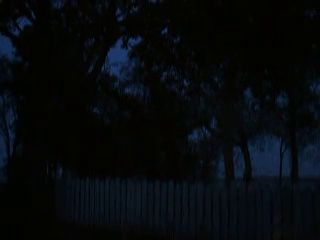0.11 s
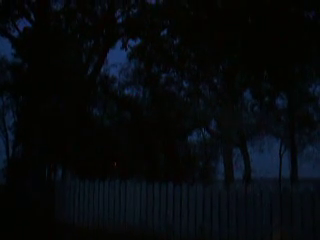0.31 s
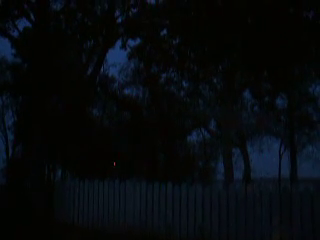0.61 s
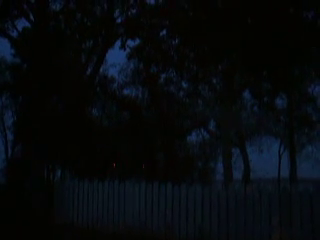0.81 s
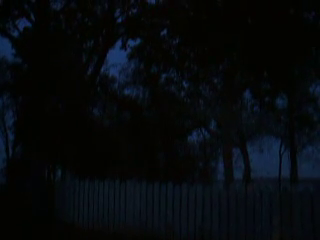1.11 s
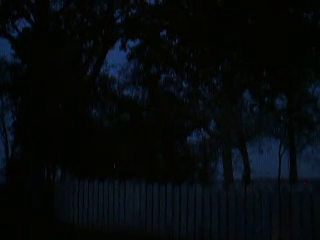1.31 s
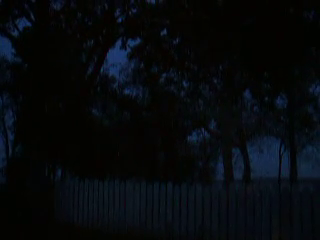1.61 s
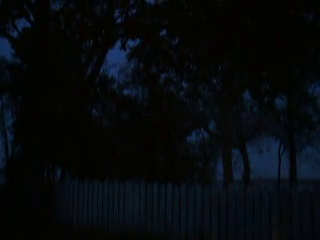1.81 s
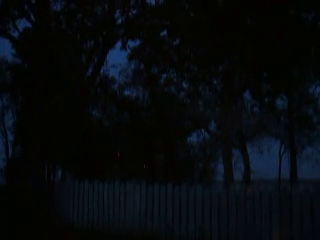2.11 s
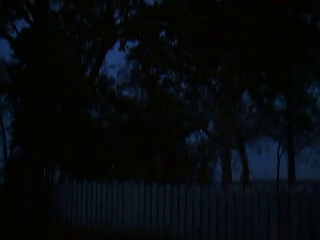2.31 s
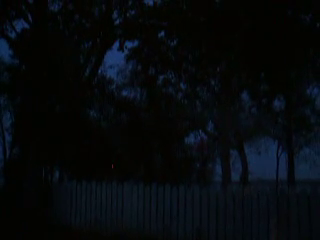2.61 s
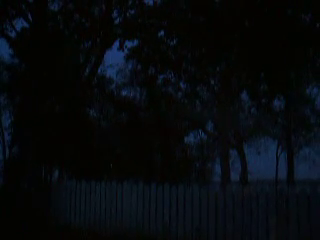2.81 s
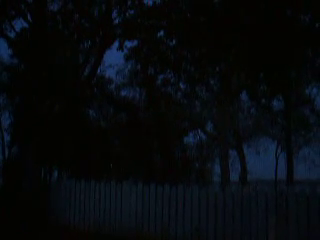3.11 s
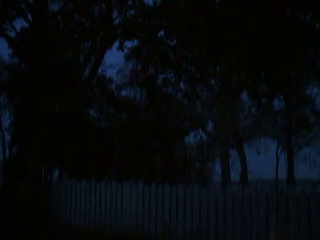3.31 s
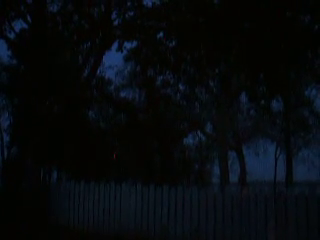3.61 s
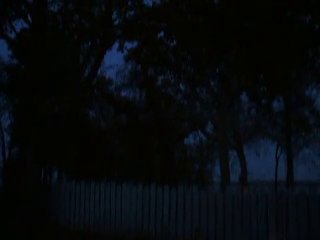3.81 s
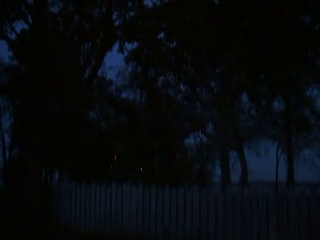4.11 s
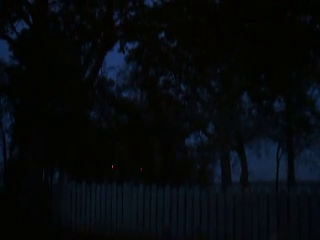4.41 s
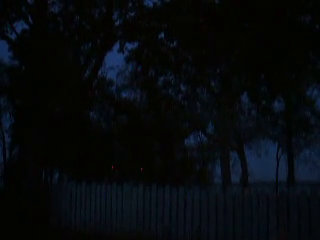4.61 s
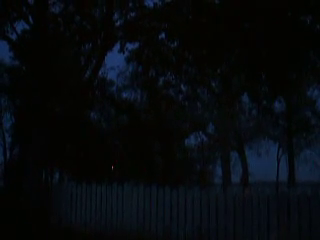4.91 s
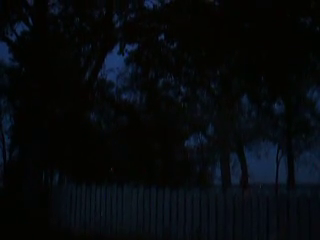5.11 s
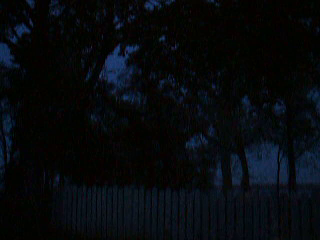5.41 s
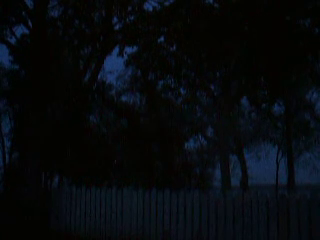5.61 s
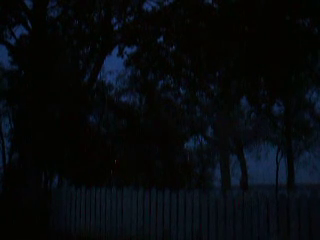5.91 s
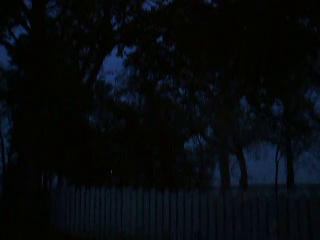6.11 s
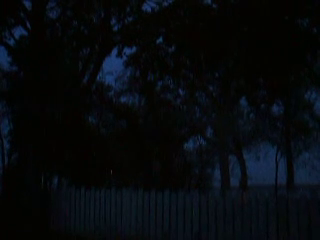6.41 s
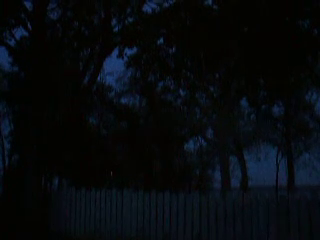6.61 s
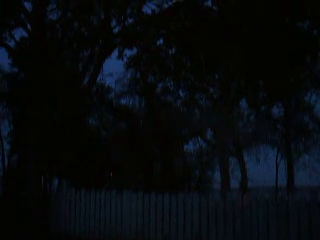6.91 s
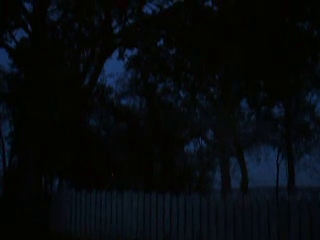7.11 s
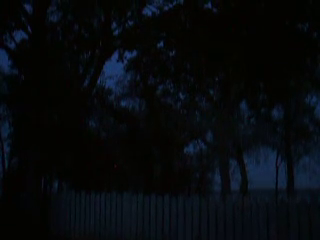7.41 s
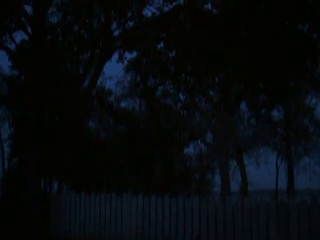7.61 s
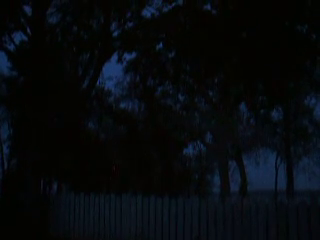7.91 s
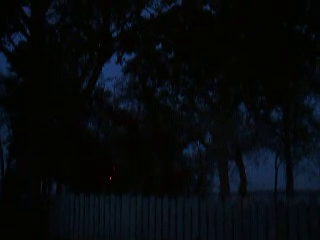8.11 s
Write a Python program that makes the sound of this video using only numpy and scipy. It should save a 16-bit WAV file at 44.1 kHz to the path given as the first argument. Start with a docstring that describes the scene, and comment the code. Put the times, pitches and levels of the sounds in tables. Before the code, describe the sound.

A dawn chorus in a fenced garden with tall trees, captured by a small hissy microphone. Low distant rumble, soft hiss and a barely audible thin whine continue throughout. From 0.2 to 2 seconds, sharp chips drop steeply in pitch about six times a second; thinner ticks take over from 1.8 to 4.3. A high falling tseep comes roughly every second from 1.0, strongest near 5.5. Soft rising and falling whistles and buzzy twitters appear around 1-2 seconds and again at 4.4-5.5, with faint pips from 3.4 to 4.3. Calls swooping down and up come at 5.8, 6.9 and 7.9. Quick carolled warbles sound near 6.3 and 7.4. Brighter chips return from 6.9 to 8.2, with more whistles. Far birds twitter continuously, swelling around 2 and 3.4-5 seconds and thinning near 6.7; every note is blurred by echoes from trunks and leaves.

```python
"""Dawn chorus in a garden with tall trees

A small camera with a hissy microphone hears falling chips, thinner ticks and a high 'tseep' about once a second.
Other birds swoop, whistle, pip and carol; far ones twitter. Each voice is an unsteady sine on a pitch curve.
Trunks and leaves scatter every note by sparse random echoes, over shaped noise: low distant rumble and hiss.
"""
import sys
import numpy as np
from scipy import signal
from scipy.fft import rfft, irfft
from scipy.io import wavfile
from scipy.ndimage import uniform_filter1d

SR = 44100
rng = np.random.default_rng(int(sys.argv[2]) if len(sys.argv) > 2 else 0)


def wav_record(signal):
    """Record a signal, one row per channel, as 16-bit PCM in the file named by sys.argv[1]."""
    frames = np.transpose(np.atleast_2d(signal))
    bounded = np.clip(frames, -1, 1)
    # unit amplitude maps onto the largest positive 16-bit level
    quanta = np.round(bounded * 32767).astype(np.int16)
    wavfile.write(sys.argv[1], SR, quanta)


N = 364707


def gain_of(db):
    """Decibels to amplitude."""
    return 10 ** (np.asarray(db) / 20)


def evened(x):
    """Scales to rms 1."""
    return x / np.sqrt(np.mean(x ** 2) + 1e-20)


def read(points, hz):
    """Reads a table on a log-frequency axis."""
    f, value = np.transpose(points)
    return np.interp(np.log(hz + 1), np.log(f + 1), value)


def add(mix, s, sound):
    """Mixes a sound in at time s, cut off at the end of the mix."""
    part = mix[max(round(s * SR), 0):][:len(sound)]
    part += sound[:len(part)]


def drift(count, size):
    """Random wander of rms 1, noise smoothed twice over size samples."""
    smooth = uniform_filter1d(rng.standard_normal(count), size)
    return evened(uniform_filter1d(smooth, size))


def syrinx(hz, fade, waver=0.0067, flutter_db=2.33):
    """A bird's voice box: a nearly pure tone on a pitch curve, unsteady in pitch and level, with soft ends."""
    count = len(hz)
    unsteady_hz = hz * (1 + waver * drift(count, size=120))
    turns = np.cumsum(unsteady_hz) / SR
    flutter = gain_of(flutter_db * drift(count, size=240))
    swell = signal.windows.tukey(count, np.clip(fade, .05, 1)) * flutter
    return np.sqrt(2) * swell * np.sin(2 * np.pi * turns)


def slur(length, start_hz, middle_hz, end_hz, warble_hz, warble_rate, fade):
    """One note on a parabola of pitch, with a fast warble riding on it."""
    t = np.arange(int(max(length, .01) * SR)) / SR
    curve = np.polyfit([0, .5, 1], [start_hz, middle_hz, end_hz], 2)
    arch = np.polyval(curve, t / t[-1])
    warble = warble_hz * np.sin(2 * np.pi * warble_rate * t)
    return syrinx(arch + warble, fade)


def trees(x, near_db, far_db, near_t60):
    """Quick scatter from nearby trunks and leaves, then a long thin tail from the whole grove."""
    # decay of the grove's tail by pitch: f/Hz, t60/s
    grove_decay = [(1500, 0.73), (3000, 1), (6000, 0.69)]
    t = np.arange(SR) / SR
    # sparse clicks of either sign, 3000 a second on average
    near, far = rng.choice([-1., 1.], (2, SR)) * (rng.random((2, SR)) < 3000 / SR)
    near = near * gain_of(-60 * t / near_t60) * (1 - np.exp(-t / 0.0024))
    # the far tail builds up more slowly and each frequency dies at its own pace
    hz, at, z = signal.stft(far * (1 - np.exp(-t / 0.019)), SR, nperseg=256)
    tail = z * gain_of(-60 * at / read(grove_decay, hz)[:, None])
    far = signal.istft(tail, SR, nperseg=256)[1][:SR]
    near_echoes = gain_of(near_db) * near / np.linalg.norm(near)
    far_echoes = gain_of(far_db) * far / np.linalg.norm(far)
    return x + signal.fftconvolve(x, near_echoes + far_echoes)[:N]


def repeater(shape, rows, spread, uneven_db=.3):
    """A bird that repeats one syllable, never at quite the same pitch or strength."""
    at, hz, db = np.transpose(shape)
    t = np.arange(0, at[-1], 1 / SR)
    out = np.zeros(N)
    chances = rng.standard_normal((len(rows), 2))
    # a row may end in a pitch factor; without one the product is 1
    for (s, level_db, *factor), (sharp, loud) in zip(rows, chances):
        pitch = np.interp(t, at, hz) * np.prod(factor) * (1 + spread * sharp)
        tone = syrinx(pitch, fade=0.044)
        add(out, s, tone * gain_of(level_db + uneven_db * loud + np.interp(t, at, db)))
    return out


def run_of(runs, lag_s):
    """Times and levels of each run's syllables: a steady beat after a slow start, on one arch of loudness."""
    settle_beats = 1.7  # time constant of the slow start
    rows = []
    for first, last, beat, *levels_db in runs:
        k = np.arange(round((last - first) / beat) + 1)
        times = first + k * beat + lag_s * (1 - np.exp(-k / settle_beats))
        loudness = np.polyfit([0, .5, 1], levels_db, 2)
        rows += zip(times, np.polyval(loudness, k / k[-1]))
    return rows


def whistler(rows, contour, fade):
    """Clear slurs of one contour with a slight warble, easing off in level toward the end."""
    out = np.zeros(N)
    for s, length, hz, db in rows:
        note = slur(length, *hz * np.array(contour), warble_hz=20, warble_rate=40, fade=fade)
        add(out, s, note * gain_of(db + np.linspace(.2, -1.5, len(note))))
    return out


def warbler(rows, warble_rate, fade):
    """Short arched syllables with a quick shake of pitch."""
    # share of the note's pitch at its start, middle and end
    arch = (.94, 1.01, .97)
    out = np.zeros(N)
    for s, length, hz, db, warble_hz in rows:
        note = slur(length, *hz * np.array(arch), warble_hz, warble_rate, fade)
        add(out, s, gain_of(db) * note)
    return out


def air():
    """Low distant rumble running up into microphone hiss: shaped noise whose level wanders slightly."""
    # noise spectrum, relative: f/Hz, density/dB
    spectrum = [(20, -6.5), (45, -1.5), (70, 1.5), (95, -5.5), (125, -2), (188, 0.5), (270, -9.5),
                (600, -9.5), (1400, -14), (2200, -15.5), (4600, -19.5), (6000, -19.5), (7700, -23.5),
                (8400, -32)]
    hz = np.fft.rfftfreq(N, 1 / SR)
    shape = gain_of(read(spectrum, hz)) * (hz < 9000)
    noise = irfft(rfft(rng.standard_normal(N)) * shape, N)
    return gain_of(-47 + 0.36 * drift(N, size=4000)) * evened(noise)


def far_chorus(count, low_hz, high_hz, level_db):
    """Many birds too far off to tell apart: one note per equal slot, at a chance moment, pitch and bend."""
    # how busy the far birds sound: t/s, relative level/dB
    bustle = [(0, -7), (.7, -5), (1.2, 1), (2, 7), (2.8, -2.5), (3.4, 4.5), (4.1, 2), (4.55, 4), (5.3, 3),
              (6.7, -8), (7.4, -2), (8.2, 1)]
    out = np.zeros(N)
    for turn, (when, length, pitch, bend, loud) in enumerate(rng.random((count, 5))):
        hz = low_hz * (high_hz / low_hz) ** pitch
        glide = .35 * (bend - .5)
        note = slur(0.02974 + .07 * length, hz * (1 + glide), hz, hz * (1 - glide / 2),
                    warble_hz=69, warble_rate=45.3, fade=0.42)
        add(out, (turn + when) / count * N / SR, gain_of(3 * loud) * note)
    bustle_db = np.interp(np.arange(N) / SR, *np.transpose(bustle))
    scattered = trees(out, near_db=4.5, far_db=9.0, near_t60=0.22)
    return gain_of(level_db + bustle_db) * evened(scattered)


def falling_chips():
    """Sharp chips, each a steep drop in pitch, in runs on a quick beat."""
    # syllable: t/s from its start, f/Hz, relative level/dB
    chip = [(0, 4950, -6), (.003, 4550, -6), (.008, 3950, -2.5), (.016, 3380, -5.5), (.026, 2750, -7.5),
            (.034, 1860, -8.5)]
    # runs: first t/s, last t/s, beat/s, relative level/dB at start, middle and end
    chip_runs = [(.208, 2.0, .1612, -47.5, -46.5, -46.5), (6.893, 7.39, .160, -45.5, -41.5, -41),
                 (7.526, 8.18, .158, -43, -41.5, -43.5)]
    chips = repeater(chip, run_of(chip_runs, lag_s=.019), spread=0.0085)
    return gain_of(-1.5) * trees(chips, near_db=-1.0, far_db=-5.0, near_t60=0.17)


def whistles():
    """Whistles told apart by contour: rising, falling, level, sinking low, or climbing and dropping back."""
    # contours: share of the note's pitch at its start, middle and end
    rise = (.875, 1, 1.035)
    fall = (1.075, .997, .987)
    hold = (1.03, 0.99, 1.004)
    sigh = (1.115, 1, .91)
    hump = (.85, 0.98, .84)
    # notes of each contour, each fall answering a rise: t/s, length/s, f/Hz, relative level/dB
    rises = [(.854, .064, 2530, -57), (1.202, .13, 2380, -54.5), (1.64, 0.11, 2520, -53.5),
             (1.799, .079, 2285, -57), (2.035, 0.058, 2434, -53), (4.534, 0.075, 2420, -54.5),
             (4.939, 0.057, 2447, -53), (5.335, 0.066, 2450, -51.5), (5.38, .033, 3025, -50),
             (5.512, 0.088, 2300, -53.5), (7.611, 0.068, 2480, -51), (7.835, .04, 3290, -53),
             (8.222, .045, 3354, -51)]
    falls = [(.939, 0.092, 2764, -50), (1.329, .13, 2734, -48.5), (1.722, 0.18, 2684, -52.5),
             (4.62, 0.13, 2695, -53.5), (5.01, .06, 2810, -56.5), (7.666, .11, 2696, -51)]
    holds = [(2.598, 0.066, 2260, -52), (4.76, 0.12, 2640, -58.5), (5.072, 0.16, 2607, -52.5),
             (7.805, .06, 2650, -52.5), (8.092, 0.095, 2600, -49)]
    sighs = [(.663, .17, 1860, -63), (1.425, .13, 1835, -58.5), (2.04, .17, 1817, -59.5),
             (2.783, .24, 1708, -59.5), (5.789, .116, 1790, -55), (6.53, .13, 1772, -52.5)]
    humps = [(.4, .11, 2427, -57.5)]
    voices = [(rises, rise), (falls, fall), (holds, hold), (sighs, sigh), (humps, hump)]
    notes = sum(whistler(rows, contour, fade=.15) for rows, contour in voices)
    return gain_of(-0.2) * trees(notes, near_db=-6.5, far_db=-5, near_t60=0.28)


def high_tseeps():
    """A high, gently falling 'tseep' about once a second."""
    # syllable: t/s from its start, f/Hz, relative level/dB
    tseep = [(0, 6350, -11), (.008, 6280, -7), (.02, 5844, -5), (.032, 5560, -2), (.045, 5230, -10.5)]
    # calls: t/s, relative level/dB, pitch factor
    tseep_calls = [(1.009, -48, 1.0), (2.059, -48.5, .985), (3.211, -48, .99), (4.303, -49, 0.99),
                   (5.091, -56, 1), (5.479, -43.5, 1.018), (6.428, -49, 0.975), (7.465, -50, 0.99)]
    tseeps = repeater(tseep, tseep_calls, spread=0.0033)
    return gain_of(-1.0) * trees(tseeps, near_db=1.3, far_db=-3.0, near_t60=0.2)


def buzzing_twitters():
    """Far twitters that buzz because their pitch shakes wide and fast."""
    # twitters: t/s, length/s, relative level/dB
    buzzes = [(1.118, 0.046, -47.5), (1.21, .056, -54), (1.514, 0.051, -48), (1.7, 0.063, -53.5),
              (1.902, 0.077, -48.5), (4.412, 0.045, -56), (4.51, 0.047, -52.5), (4.808, 0.065, -51),
              (5.18, .11, -51.5), (5.309, 0.057, -52), (7.451, .06, -56), (7.866, 0.052, -48.5)]
    buzz_hz, depth_hz = 3705, 410  # pitch that the arch bends, and the shake to either side
    rows = [(s, length, buzz_hz, db, depth_hz) for s, length, db in buzzes]
    twitters = warbler(rows, warble_rate=90, fade=0.28)
    return gain_of(-4.0) * trees(twitters, near_db=-3.5, far_db=-0.5, near_t60=0.3)


def carols():
    """Carolled phrases of short syllables, each with its own depth of warble."""
    # syllables: t/s, length/s, f/Hz, relative level/dB, warble depth/Hz
    carol_notes = [(1.267, .06, 2250, -56, 115), (1.85, .09, 2060, -57, 59.4),
                   (2.645, 0.053, 2040, -54.5, 10), (6.225, 0.066, 1850, -53.5, 50),
                   (6.272, 0.074, 2470, -48.5, 73), (6.31, 0.029, 2186, -46.5, 5),
                   (6.34, 0.037, 2380, -43.5, 170), (6.385, 0.057, 2117, -47.5, 43),
                   (7.392, .04, 2450, -47, 12), (7.43, 0.054, 2405, -43, 190),
                   (7.485, .05, 2550, -54.5, 91), (7.505, 0.087, 2130, -47.5, 105),
                   (7.675, 0.061, 2088, -49, 77)]
    song = warbler(carol_notes, warble_rate=67, fade=0.39)
    return gain_of(-1.0) * trees(song, near_db=-5.0, far_db=-8.5, near_t60=0.29)


def thin_ticks():
    """Thinner falling ticks that start higher than the chips, in one run."""
    # syllable: t/s from its start, f/Hz, relative level/dB
    tick = [(0, 5996, -20), (.005, 5290, -16.5), (.009, 4396, -16.5), (.015, 3900, -14), (.021, 3520, -7),
            (.026, 3202, -8), (.032, 2460, -20)]
    # run: first t/s, last t/s, beat/s, relative level/dB at start, middle and end
    tick_runs = [(1.841, 4.25, .1585, -45, -42, -45)]
    ticks = repeater(tick, run_of(tick_runs, lag_s=.026), spread=0.0048)
    return gain_of(1.5) * trees(ticks, near_db=-6.0, far_db=-7.0, near_t60=0.11)


def soft_pips():
    """One run of soft short pips that sink only slightly in pitch."""
    # syllable: t/s from its start, f/Hz, relative level/dB
    pip = [(0, 3430, -6), (.014, 3257, 1), (.03, 3190, -3)]
    # run: first t/s, last t/s, beat/s, relative level/dB at start, middle and end
    pip_runs = [(3.41, 4.33, .181, -59.5, -56.5, -57)]
    pips = repeater(pip, run_of(pip_runs, lag_s=.014), spread=0.0034)
    return gain_of(-1.0) * trees(pips, near_db=-3.5, far_db=0.5, near_t60=0.3)


def swooping_calls():
    """A call whose pitch swoops down and up again."""
    # syllable: t/s from its start, f/Hz, relative level/dB
    swoop = [(0, 3513, -6), (.018, 3350, -1), (.042, 3130, 0.5), (.058, 2598, -11.5), (.072, 2333, -1.5),
             (.086, 2520, -1.5), (.102, 2960, 2.5), (.12, 3080, 0.5)]
    # calls: t/s, relative level/dB
    swoop_calls = [(5.78, -46), (6.9, -47), (7.918, -45.5)]
    swoops = repeater(swoop, swoop_calls, spread=0.0031)
    return gain_of(-1.0) * trees(swoops, near_db=-3.5, far_db=-8, near_t60=0.22)


def scene():
    """The birds, each with its own share of echo from the trees, over the air."""
    chorus = far_chorus(count=230, low_hz=1479, high_hz=3726, level_db=-61.0)
    high_chorus = far_chorus(count=160, low_hz=3810, high_hz=5950, level_db=-67.0)
    backdrop = air() + chorus + high_chorus
    repeated = falling_chips() + high_tseeps() + thin_ticks() + soft_pips() + swooping_calls()
    sung = whistles() + buzzing_twitters() + carols()
    return (backdrop + repeated + sung)[None]


def record(dry):
    """The camera adds a faint whine, cuts the treble above about 8.5 kHz and shifts the wave by a steady offset."""
    # thin electronic tones ahead of the treble cut: f/Hz, level/dB
    whine_tones = [(5938, -71), (7677, -87), (7709, -81.5), (8323, -93.5)]
    t = np.arange(N) / SR
    whine = sum(np.sqrt(2) * gain_of(db) * np.sin(2 * np.pi * hz * t) for hz, db in whine_tones)
    offset = -.0752
    lowpass = signal.firwin(301, 8500, window=("kaiser", 9), fs=SR)
    return signal.oaconvolve(dry + whine, lowpass[None], "same") + offset


dry = scene()
out = record(dry)
wav_record(out)
```